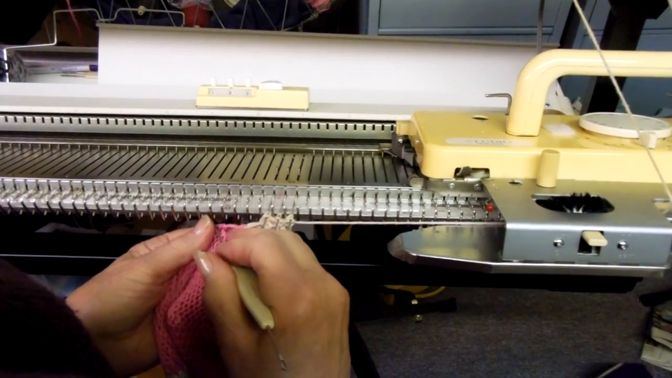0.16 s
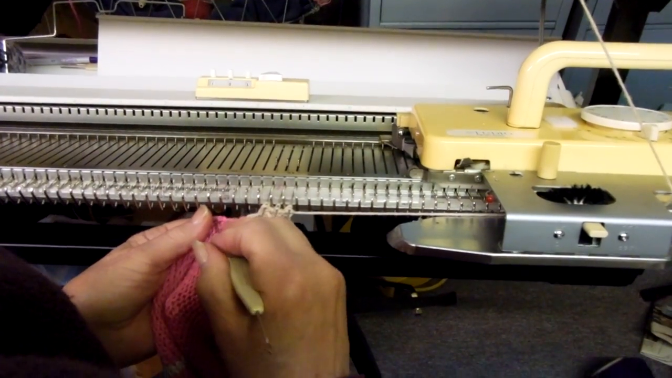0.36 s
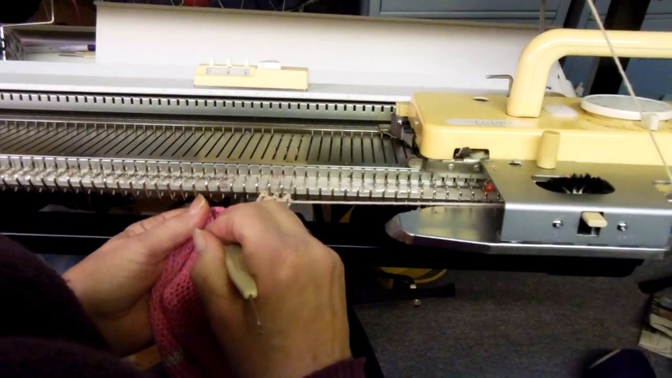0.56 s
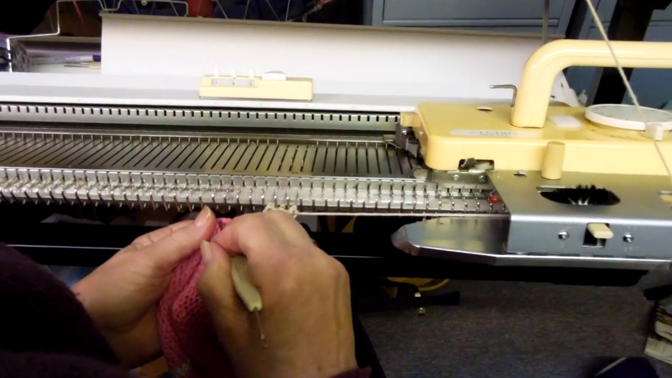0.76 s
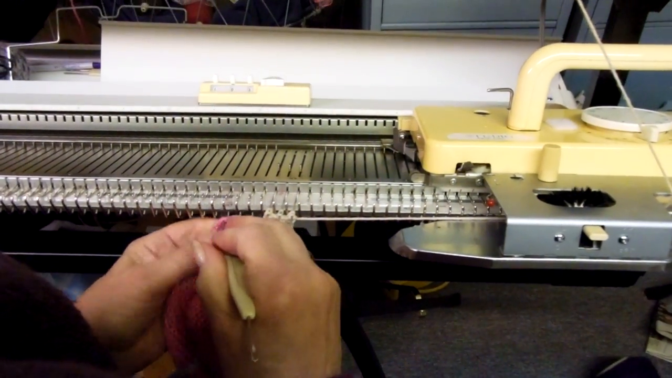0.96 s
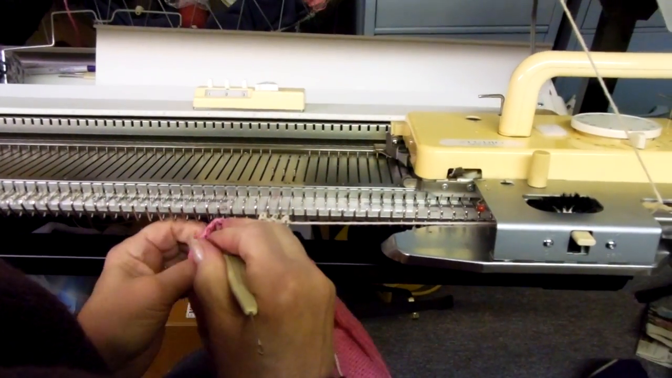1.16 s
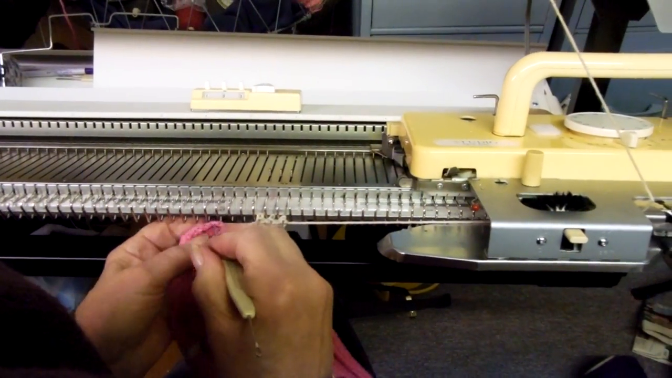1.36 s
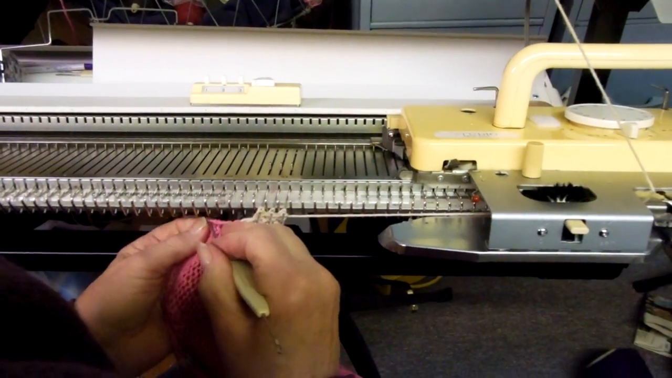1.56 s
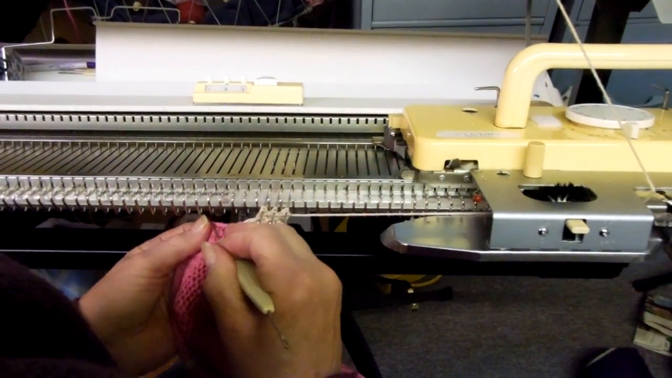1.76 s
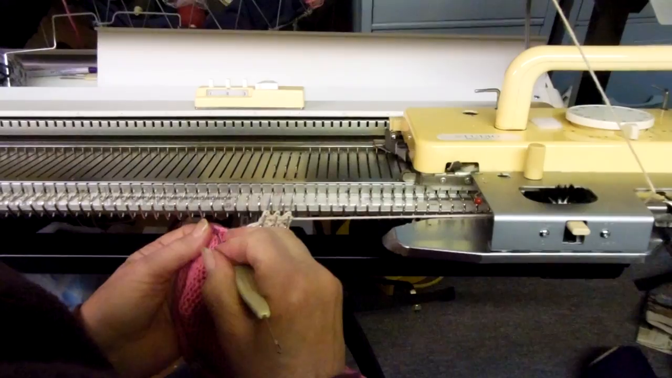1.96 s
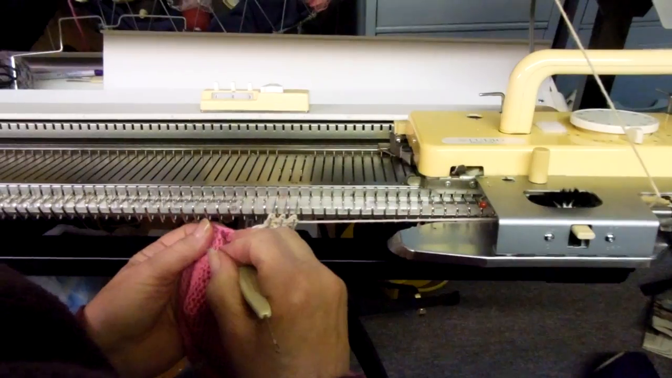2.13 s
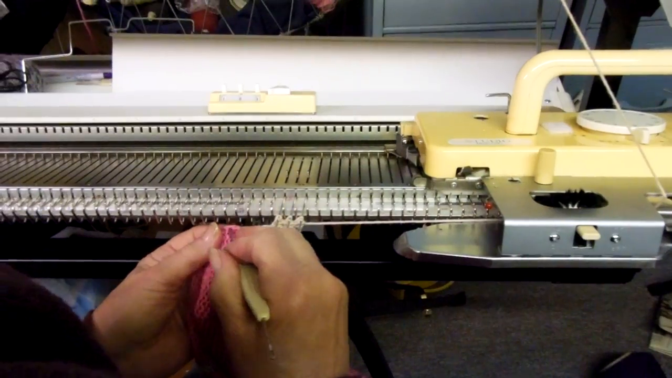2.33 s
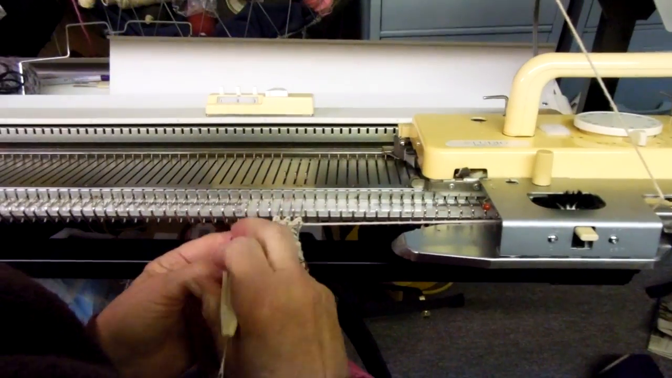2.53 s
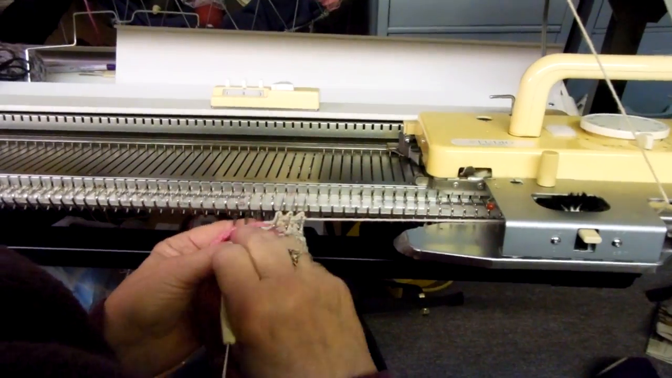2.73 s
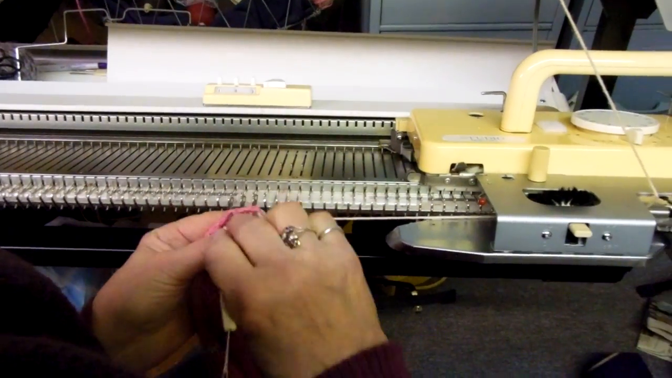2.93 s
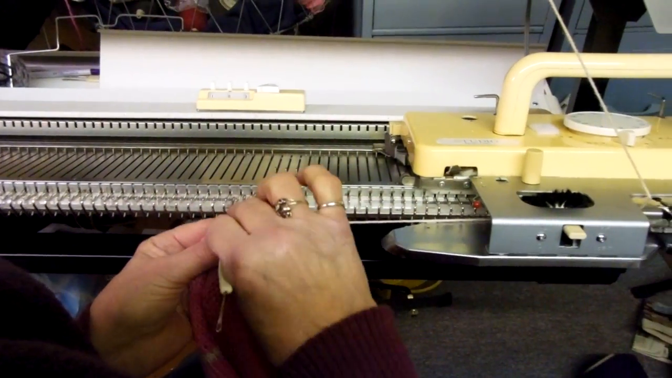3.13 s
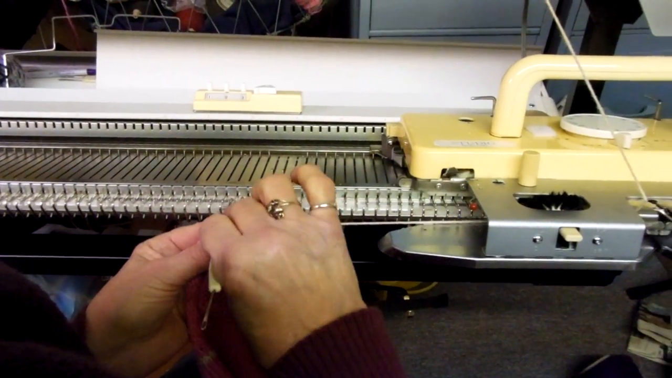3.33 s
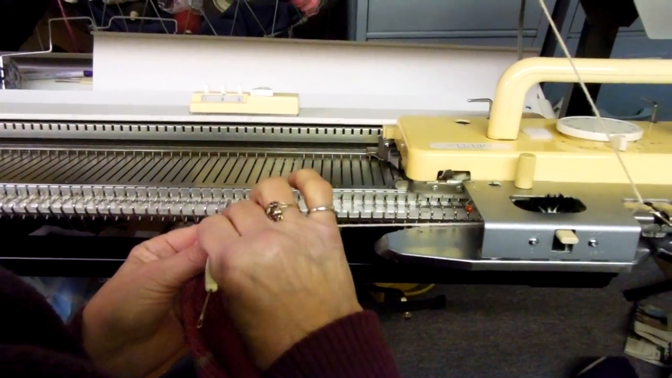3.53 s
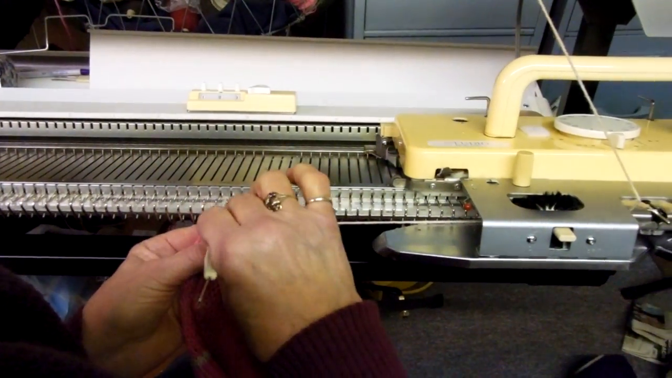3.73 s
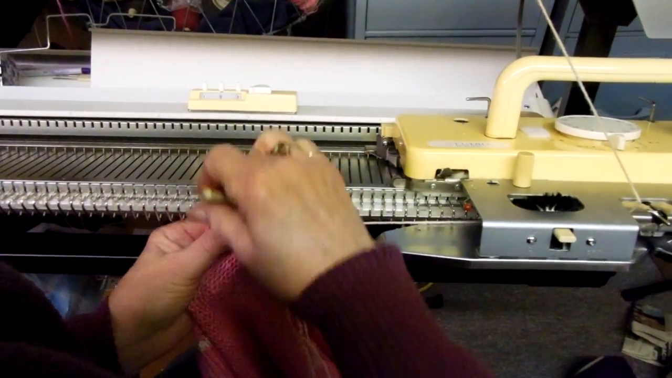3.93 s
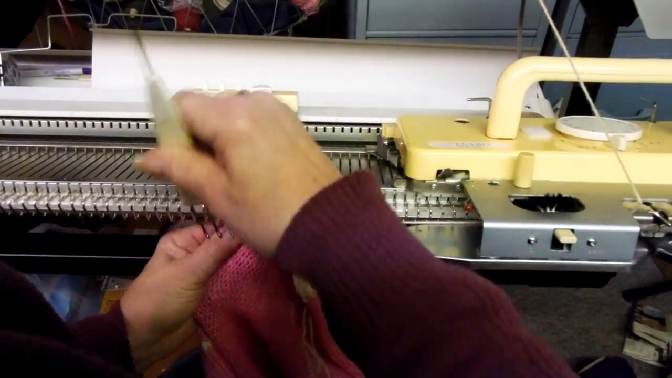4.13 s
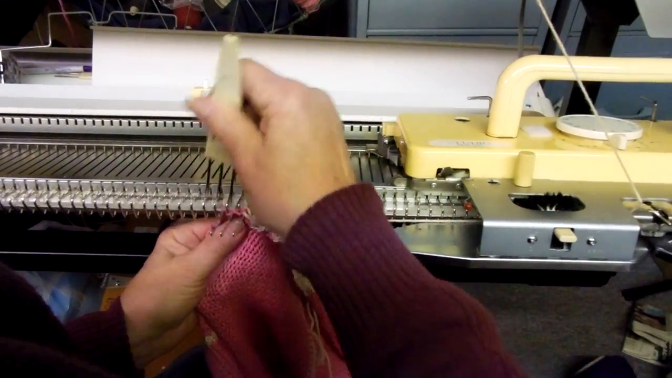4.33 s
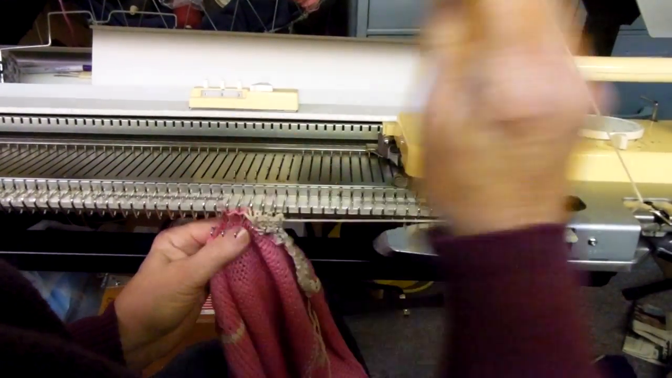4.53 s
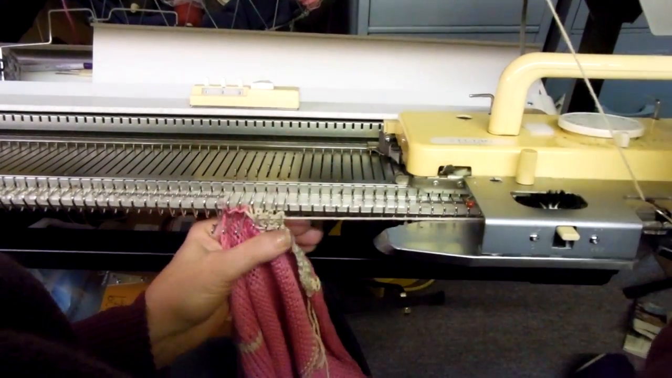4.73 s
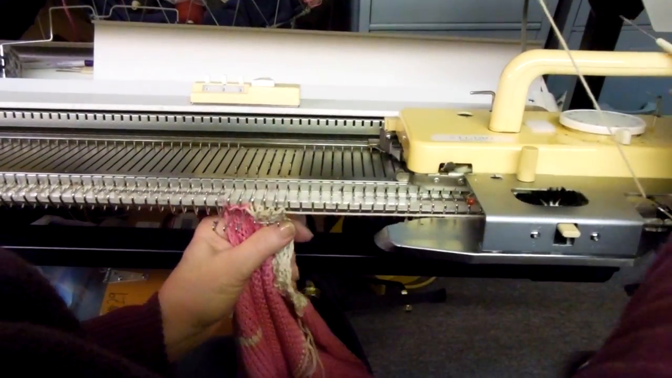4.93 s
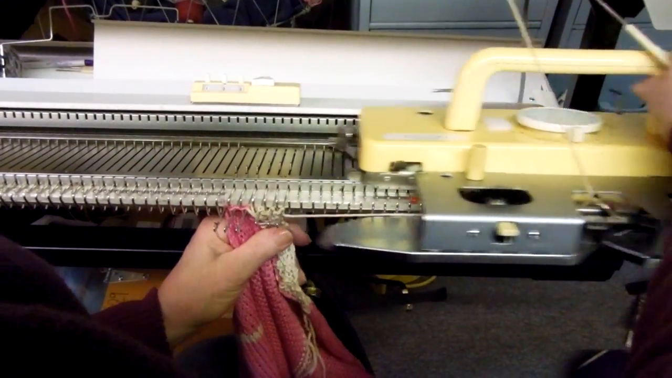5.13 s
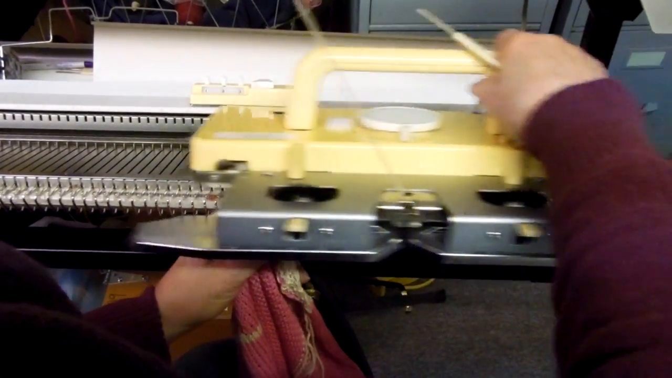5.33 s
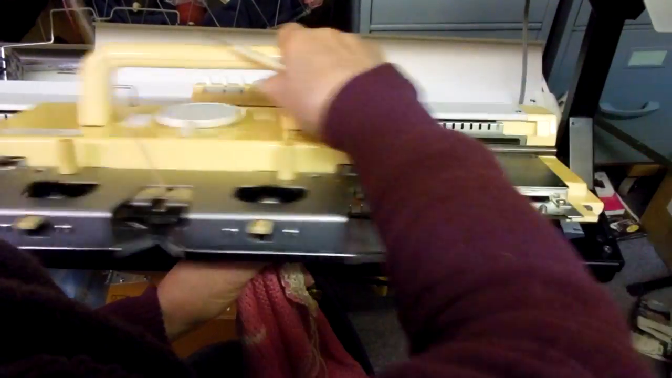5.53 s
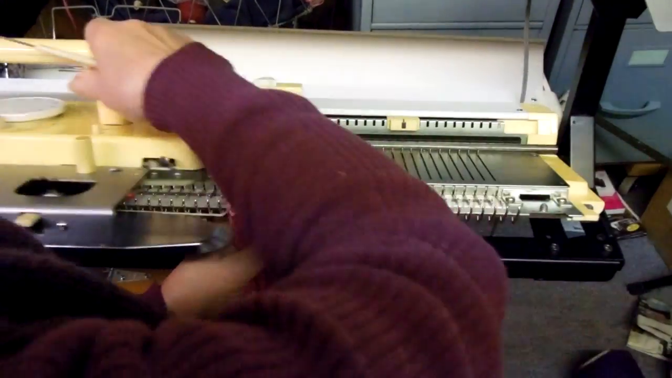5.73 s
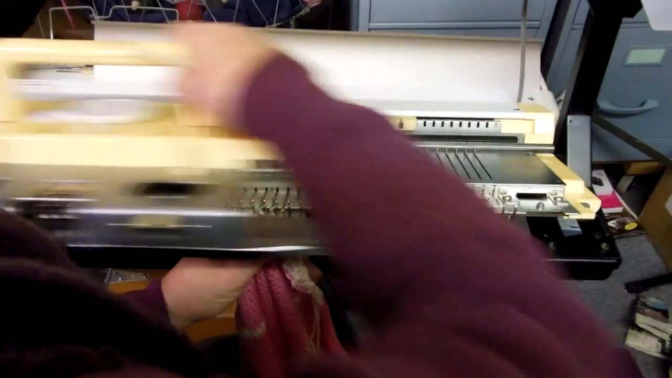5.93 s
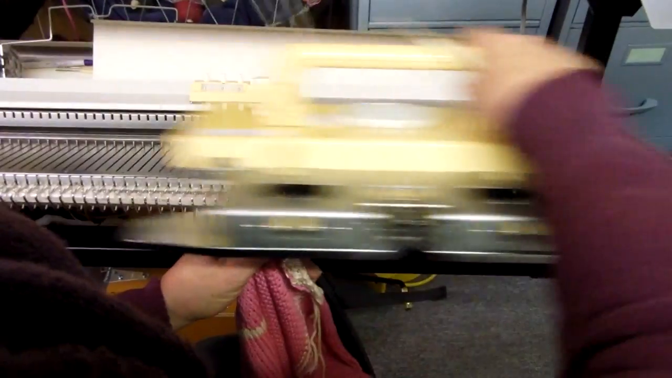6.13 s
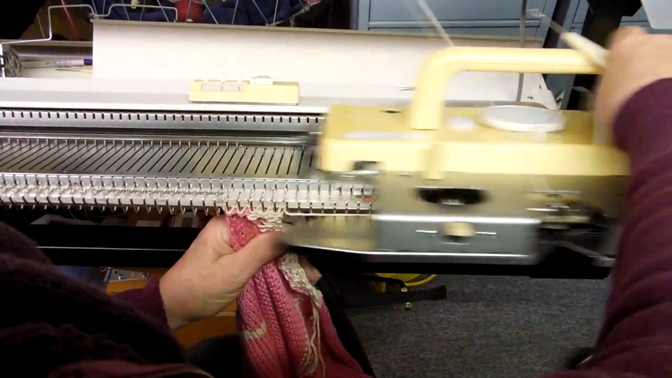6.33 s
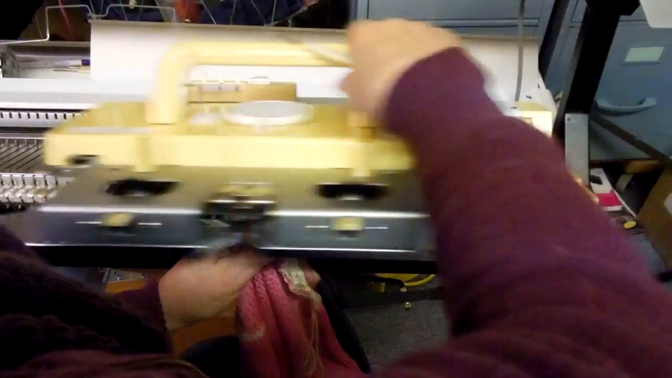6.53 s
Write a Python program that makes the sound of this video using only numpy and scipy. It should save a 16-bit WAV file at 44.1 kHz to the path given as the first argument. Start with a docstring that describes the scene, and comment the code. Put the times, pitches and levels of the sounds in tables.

```python
"""Knitting machine at close range

A quiet room, a small stereo microphone close to the needle bed. A hand tool ticks and scrapes on the
steel needles (short rings, bands of noise and gliding whistles), dry snaps and a low creak sit near the
microphone; then the carriage is pushed to and fro over the bed, its cams flicking needles in dense
bursts of pings and hiss, with rumble and thuds. Mains tones, a thin whine and room hiss lie underneath.
"""
import sys
import numpy as np
from scipy import signal
from scipy.fft import rfft, irfft, next_fast_len
from scipy.io import wavfile
from scipy.ndimage import map_coordinates

SR = 44100
rng = np.random.default_rng(int(sys.argv[2]) if len(sys.argv) > 2 else 0)


def output_pcm(signal):
    """Save a mono or channel-first signal as 16-bit PCM at the path in sys.argv[1].

    Samples are clipped to [-1, 1] before scaling.
    """
    pcm = np.clip(np.atleast_2d(signal).T, -1, 1) * 32767
    wavfile.write(sys.argv[1], SR, np.round(pcm).astype(np.int16))


N = 294709  # samples
TOP_HZ = 14200  # upper band limit


def amp(db):
    """Amplitude factor for a level in dB."""
    return 10 ** (np.asarray(db) / 20)


def unit(x):
    """x scaled to rms 1."""
    return x / np.sqrt(np.mean(x ** 2) + 1e-20)


def along(points, hz):
    """(Hz, value) points read off on a log frequency axis."""
    f, v = np.transpose(points)
    return np.interp(np.log(hz + 1), np.log(f + 1), v)


def curves(rows):
    """One value per sample for each column; the last item is 1 inside the span, with soft ends."""
    s, *cols = np.transpose(rows)
    t = np.arange(N) / SR
    to_nearest_end = np.minimum(t - s[0] + .002, s[-1] + .002 - t)
    inside = np.clip(to_nearest_end / .004, 0, 1)
    return [np.interp(t, s, c) for c in cols] + [inside]


def played(spans, layer):
    """A layer driven by the controls of each span in turn."""
    return sum(on * layer(*controls) for *controls, on in map(curves, spans))


def wobble(rate):
    """A smooth random curve, rate knots a second."""
    knots = rng.standard_normal(int(N * rate / SR) + 4)
    return map_coordinates(knots, [np.arange(N) * rate / SR])


def filtered(x, response):
    """x shaped by a complex response of frequency."""
    m = next_fast_len(N + SR // 2)
    return irfft(rfft(x, m) * response(np.fft.rfftfreq(m, 1 / SR)), m)[..., :N]


def noise(response):
    """Two unrelated coloured noises, rms 1 together: what both microphone ports share, and what differs."""
    return unit(filtered(rng.standard_normal((2, N)), response))


def resonances(modes):
    """Causal response of (Hz, width Hz, dB) modes, alternating in sign."""
    def response(f):
        total = 0
        for k, (centre, width, db) in enumerate(modes):
            damping = 1j * f * width
            total = total + (-1) ** k * amp(db) * damping / (centre * centre - f * f + damping)
        return total
    return response


def spread(pair, alike):
    """Left and right from a mid and an unrelated side signal, as alike as asked at each frequency."""
    def weights(hz):
        turn = np.arccos(np.clip(along(alike, hz), -1, 1)) / 2
        return np.array([np.cos(turn), np.sin(turn)])
    mid, side = filtered(pair, weights)
    return np.array([mid + side, mid - side])


# Colour of the room tone. Each row: frequency in Hz, relative level in dB.
ROOM_TONE = [(8, -4.5), (24, 0.5), (40, -13), (65, -6.5), (100, -17.5), (200, -20), (350, -24.5),
             (1000, -29), (3000, -35), (8000, -38.5), (14200, -38.5)]
# Two mains tones and a thin whine. Each row: frequency in Hz, relative level in dB.
MAINS_TONES = [(120, -63), (240, -60), (13192, -76)]
# How alike the room tone is at both ports. Each row: frequency in Hz, left-right likeness (1 is identical).
ROOM_TONE_ALIKE = [(60, 0.93), (180, 0.41), (550, 0.43), (1640, 0.19), (4950, 0.084), (14900, 0.053)]


def air():
    """Room rumble and hiss as coloured noise, with slowly wavering sines slightly louder left than right."""
    t = np.arange(N) / SR
    tones = 0
    for hz, db in MAINS_TONES:
        level = amp(db + 2 + 0.49 * wobble(5.4))
        tones = tones + level * np.sin(2 * np.pi * hz * t + 0.15 * wobble(3.04))
    hiss = spread(noise(lambda hz: amp(along(ROOM_TONE, hz))), ROOM_TONE_ALIKE)
    return amp(-50.5 + 0.043 * wobble(3.5)) * hiss + tones * amp([[.7], [-.7]])


# Modes of the needle bed. Each row: frequency in Hz, width in Hz, relative level in dB.
BED_MODES = [(518, 133, 1.5), (656, 124, 4), (754, 111, -1.5), (925, 61, 2), (1150, 1330, -9.5)]


def bed(hz):
    """The bed's modes; it is too narrow to radiate deep bass."""
    rise = 1j * hz / 380
    return resonances(BED_MODES)(hz) * (rise / (1 + rise)) ** 2


# Contacts of tool, needles and cams.
# Each row: start in seconds, relative level in dB, pitch of the contact's own band in Hz, high band over low in dB.
CONTACTS = [(1.094, -26.5, 3100, 7), (1.1238, -37, 2940, 4), (1.1464, -26.5, 13500, 25),
            (1.1882, -38, 12100, 20), (2.5536, -29, 13100, 14), (2.571, -30, 4330, 3),
            (2.6873, -39.5, 11300, 14), (2.7052, -33.5, 7840, 7), (2.8408, -37, 4060, 0),
            (3.1003, -30.5, 14000, 3), (3.1932, -36, 13800, 17), (3.2774, -45, 12200, 12),
            (3.6912, -37.5, 10900, 12), (3.7209, -34.5, 10700, 13), (3.7803, -35.5, 8600, 13),
            (3.907, -31, 12000, 8), (3.9464, -38.5, 3300, -3), (4.115, -41, 2470, -19),
            (4.162, -38, 2370, -8), (4.1774, -30, 13600, 11), (4.2068, -20, 5000, -3),
            (4.235, -12, 5600, 9), (4.239, -4.5, 9600, 14), (4.281, -49, 9000, 4), (4.307, -39, 7500, 5),
            (4.3595, -35.5, 4000, -6), (4.4172, -27, 5900, 2), (4.4303, -21, 5500, -7),
            (5.0782, -14, 2980, -2), (5.1125, -7, 12400, 15), (5.2007, -17, 2930, -7.5),
            (5.2624, -34, 2960, -17), (5.2867, -17.5, 3900, -5), (5.324, -17, 2930, 0),
            (5.3328, -19, 3050, -5), (5.6254, 1, 4630, 4), (5.7352, -4, 6800, 9), (5.7536, -7, 4160, 0),
            (5.824, -16.5, 7000, 4), (5.8358, -12.5, 7900, 4), (5.8485, -23, 10100, 24),
            (5.8716, -13, 11600, 11), (5.8846, -16.5, 8700, 17), (5.9525, -19.5, 3350, -5.5),
            (5.9695, -18, 9080, 5), (6.0718, -5, 13600, 17), (6.122, -2, 6700, 18), (6.2858, -15, 5140, 2),
            (6.3298, -18, 9400, 17), (6.35, -20.5, 13500, 10), (6.3798, -8, 14800, 20),
            (6.3924, -18.5, 8100, 21), (6.4656, -22.5, 2300, -7), (6.504, -13, 13700, 23)]
# What the needles ring with. Each row: frequency in Hz, relative level in dB, time to fall 60 dB in seconds.
NEEDLE_RINGS = [(3300, -19, .07), (3870, -5, .1), (4470, 2, 0.082), (5195, -14, 0.14), (6050, -15, .08),
                (7460, -13, .07), (9200, 0, 0.12), (11540, -8, .05), (13040, 8, 0.049)]
LOW_BAND_T60_S = .033
USUAL_LOW_HZ, USUAL_HIGH_HZ = 4290, 8600  # where the other band of a contact sits
BAND_SPLIT_HZ = 6300  # a pitch above this sets the high band, otherwise the low one


def ticks():
    """Each contact: a crack, a low and a high band, a faint needle ring; duller ones knock the bed harder."""
    out, blows = np.zeros((2, N + SR)), np.zeros((2, N + SR))
    t = np.arange(SR // 6) / SR
    above = signal.butter(2, 1900, "high", fs=SR)
    fall_db = -60 * t / LOW_BAND_T60_S
    attack = 1 - np.exp(-t / 0.0011)

    def band(x, hz, half_hz):
        edges = [hz - half_hz, hz + half_hz]
        return unit(signal.lfilter(*signal.butter(2, edges, "band", fs=SR), x))

    for s, db, hz, high_db in CONTACTS:
        low_hz, high_hz = (USUAL_LOW_HZ, hz) if hz > BAND_SPLIT_HZ else (hz, USUAL_HIGH_HZ)
        grit = rng.standard_normal((4, 2, len(t)))
        low = amp(fall_db - high_db / 2) * band(grit[0], low_hz, 900)
        # thin parts die sooner
        high = amp(2.57 * fall_db + high_db / 2 + 4.5) * band(grit[1], high_hz, 1270)
        crack = 1.66 * amp(1.38 * fall_db + min(high_db, 0)) * signal.lfilter(*above, grit[2])
        quiver = np.cumsum(rng.normal(0, .05, len(t)))  # random drift of phase
        ring = 0
        for mode_hz, level, t60 in NEEDLE_RINGS:
            ring_db = level - 23 + rng.normal(0, 3) - 60 * t / t60
            ring = ring + amp(ring_db) * np.sin(2 * np.pi * mode_hz * t + quiver)
        at = round(s * SR)
        out[:, at:at + len(t)] += amp(db - 13.0) * (low + high + crack + ring) * attack
        blows[:, at:at + len(t)] += amp(db - 11.0 - 0.45 * high_db + fall_db) * grit[3]
    return out[:, :N] + filtered(blows[:, :N], bed)


# Dry snaps close to the microphone. Each row: start in seconds, relative level in dB.
CLOSE_SNAPS = [(2.0321, -38.5), (2.178, -40), (2.1956, -36), (2.414, -40), (2.4314, -36), (2.4614, -23),
               (2.4978, -35.5), (3.08, -36)]


def snaps():
    """A few milliseconds of noise on a one-sided push, with no ring."""
    out, t = np.zeros(N), np.arange(400) / SR
    for s, db in CLOSE_SNAPS:
        push = rng.standard_normal(len(t)) - .4
        out[round(s * SR):][:len(t)] += amp(db - 4.0 - 60 * t / 0.0065) * push
    return filtered(out, lambda hz: 1 + 1.2 / (1 + 1j * hz / 400))  # bass lift


# Low creak near the microphone, one list per span. Each row: time in seconds, level in dB.
CREAK_SPANS = [
    [(2.1, -59), (2.182, -38.5), (2.22, -52.5), (2.39, -46.5), (2.41, -49.5), (2.444, -34.5), (2.47, -42)],
    [(2.5, -76), (2.522, -40.5), (2.57, -57)],
]
SLIPS_PER_S = 130  # at the middle pace


def creak():
    """Uneven slips, each a soft low push."""
    pace, size = amp(4 * wobble(60)), amp(4.5 * wobble(90))
    soft = resonances([(62, 82.0, 1), (176, 180, -4.5), (593, 290, -32.0)])
    slips = np.diff(np.floor(np.cumsum(SLIPS_PER_S * pace) / SR), prepend=0)
    pushes = unit(filtered(slips * size, soft))
    return played(CREAK_SPANS, lambda db: amp(db) * pushes)


# The tool dragged along needles. Each row: peak in seconds, rise in seconds, fall in seconds, grit in dB,
# whistle in dB, whistle at the peak in Hz, its sag at the ends in octaves, bed in dB.
DRAGS = [(2.463, 0.04, 0.0054, -35.5, -35, 9800, 0.32, -64),
         (2.557, .002, 0.047, -35.5, -30, 13000, 0.087, -63),
         (3.125, 0.046, 0.19, -50.5, -49.5, 5320, 0.26, -61),
         (3.195, .02, 0.055, -62, -51, 4700, 0.39, -77), (3.745, 0.045, 0.07, -51, -55, 3100, 0.3, -59),
         (4.115, 0.0014, 0.065, -72, -54, 2600, 0.53, -46),
         (4.245, .08, 0.071, -29, -29.5, 4950, 0.038, -34), (4.409, .012, 0.033, -55, -55, 5000, 0, -53),
         (4.437, 0.04, 0.07, -33, -38, 6100, 0.14, -38.5), (5.114, 0.0032, 0.074, -27, -35, 4400, .3, -59)]
DRAG_DEPTH_DB, BODY_SWING = 45, 0.62  # how far below its peak a drag starts and ends; the bed swings less


def scrapes():
    """Gritty noise, a narrow resonance of the needle, and a little of the bed; each drag swells and fades."""
    grit = noise(lambda hz: 1 / (1 + (2200 / (hz + 1)) ** 4)) * amp(3.5 * wobble(300))
    narrow = noise(lambda hz: 1 / (1 + (hz / 300) ** 4)) * amp(2.2 * wobble(70))
    body, out = noise(bed), 0
    for s, rise, fall, db, whistle_db, hz, sag, body_db in DRAGS:
        swell_db, on = curves([(s - rise, -DRAG_DEPTH_DB), (s, 0), (s + fall, -DRAG_DEPTH_DB)])
        glide_hz = hz * 2 ** (sag * swell_db / DRAG_DEPTH_DB)
        whistle = narrow * np.sin(2 * np.pi * np.cumsum(glide_hz) / SR)
        steel = amp(db) * grit + amp(whistle_db) * whistle
        out = out + on * (amp(swell_db) * steel + amp(body_db + BODY_SWING * swell_db) * body)
    return out


def pings(t0, t1, count, life, spiky_db):
    """Scattered needle pings of rms 1: damped sines of random pitch and size."""
    when, pitch, size, phase = rng.random((count, 4)).T[:, :, None]
    k = np.arange(256)
    hz = 1200 + (TOP_HZ - 1200) * pitch
    height = amp(-spiky_db * np.log(1 - size))
    wave = height * np.exp(-k / SR / life) * np.sin(2 * np.pi * (hz * k / SR + phase))
    at = ((t0 + (t1 - t0) * when) * SR).astype(int) + k
    rms = np.sqrt(np.sum(wave ** 2) / (t1 - t0) / SR)
    return np.bincount(at.ravel(), wave.ravel(), N + SR)[:N] / rms


def strikes(rate, life, spread_db):
    """Level jumps at random moments, each dying away: cams meeting needle butts."""
    when, size = rng.random((2, N))
    hits = (when < rate / SR) * amp(-spread_db * np.log(1 - size))
    return signal.lfilter([1], [1, -np.exp(-1 / (life * SR))], hits)


# Three carriage strokes in five spans, one list each; the first and fourth spans are dull run-ups.
# Each row: time in seconds, needle clatter in dB, body rumble in dB.
CARRIAGE_SPANS = [
    [(5.15, -58, -58), (5.25, -51.5, -67.5), (5.3, -47.5, -54), (5.345, -40, -44.5), (5.419, -35.5, -42.5)],
    [(5.421, -20.5, -42.5), (5.47, -22, -29.5), (5.52, -17, -28.5), (5.585, -19, -37), (5.64, -15.5, -31.5),
     (5.69, -19.5, -26), (5.71, -29, -36.5), (5.75, -26.5, -26.5), (5.78, -31, -41), (5.82, -35.5, -49.5),
     (5.89, -36.5, -43), (5.92, -57, -61), (5.945, -54, -57)],
    [(5.955, -48, -56), (5.99, -32.5, -39.5), (6.02, -23.5, -37.5), (6.066, -28, -33), (6.074, -18.5, -40),
     (6.12, -15, -23), (6.17, -17.5, -38), (6.235, -19, -25.5), (6.265, -34, -32), (6.31, -32, -44.5),
     (6.37, -42.5, -52), (6.41, -51, -46), (6.45, -79, -78)],
    [(6.468, -31.5, -66), (6.496, -56.5, -60)],
    [(6.5, -28, -39.5), (6.54, -25.5, -34), (6.58, -23, -33.5), (6.62, -15.5, -26.5), (6.65, -17, -30.5),
     (6.69, -20.5, -39)],
]
# One row per span. Each row: treble tilt in dB, table thud at the usual rumble in dB.
SPAN_TONES = [(-7.5, -45.5), (0.5, -47.5), (3, -50), (-15, -48), (2.5, -49)]
# Colour of the needle clatter. Each row: frequency in Hz, relative level in dB.
CLATTER_COLOUR = [(760, -35), (1300, -16.5), (1920, -1), (2470, -1), (5710, 0.5), (6190, -1), (6640, -1),
                  (8030, -2.5), (13500, -2.5), (14200, -1)]
# Modes of the table under the machine. Each row: frequency in Hz, width in Hz, relative level in dB.
TABLE_MODES = [(84.5, 12, 0), (148, 81, -1.5)]
USUAL_CLATTER_DB, BRIGHTENS = -27.5, 0.32  # treble tilt in dB gained per dB of clatter above the usual
USUAL_RUMBLE_DB, THUD_FOLLOWS = -30, 0.73  # thud dB gained per dB of rumble above the usual


def carriage():
    """Cams flick needle after needle: clumped pings over hiss, a rumble in the bed, thuds in the table."""
    flicks = np.array([pings(5.2, 6.7, count=7000, life=0.0017, spiky_db=2.5) for part in range(2)])
    sliding = rng.standard_normal((2, N))
    needles = filtered(0.45 * flicks + 0.81 * sliding, lambda hz: amp(along(CLATTER_COLOUR, hz)))
    needles /= np.std(needles[:, -SR:])  # level set over the last second
    needles *= (0.83 + 0.28 * strikes(190, 0.0028, 2.63)) * amp(0.46 * wobble(60))
    high = filtered(needles, lambda hz: 1 / (1 + (7000 / (hz + 1)) ** 4))
    rumble = amp(3.1 * wobble(45)) * noise(bed)
    thud = noise(resonances(TABLE_MODES))

    def span(rows, tilt_db, table_db):
        db, body_db, on = curves(rows)
        bright_db = tilt_db + BRIGHTENS * (db - USUAL_CLATTER_DB)
        thud_db = table_db + THUD_FOLLOWS * (body_db - USUAL_RUMBLE_DB)
        clatter = amp(-bright_db / 4) * (needles - high) + amp(bright_db * 0.84) * high
        return on * (amp(db) * clatter + amp(body_db) * rumble + amp(thud_db) * thud)

    return sum(span(rows, *tone) for rows, tone in zip(CARRIAGE_SPANS, SPAN_TONES))


# How fast the room falls silent. Each row: frequency in Hz, time to fall 60 dB in seconds.
ROOM_DECAY = [(300, 0.31), (3000, 0.13), (12000, 0.033)]


def walls(x):
    """Each frequency of the room's answer dies at its own speed."""
    hz, t, z = signal.stft(rng.standard_normal((2, SR // 3)), SR, nperseg=256)
    fading = z * amp(-60 * t / along(ROOM_DECAY, hz)[:, None])
    tail = signal.istft(fading, SR, nperseg=256)[1]
    later = np.pad(x, (200, 0))  # samples before the walls answer
    return signal.fftconvolve(later[None], tail / np.linalg.norm(tail[0]), axes=1)[:, :N]


# How alike the near machine is at both ports. Each row: frequency in Hz, left-right likeness (1 is identical).
MACHINE_ALIKE = [(60, 0.97), (180, 1), (550, 0.99), (1640, 0.95), (4950, 0.74), (14900, 0.15)]
# Balance of the machine. Each row: frequency in Hz, left minus right in dB.
MACHINE_BALANCE = [(60, 1), (150, 2), (380, 1), (950, 3), (2370, -0.5), (5950, 3.5), (14900, -5.5)]


def placed(pair):
    """The bed is long and near: the ports agree in the bass, less in the treble."""
    return filtered(spread(pair, MACHINE_ALIKE), lambda hz: amp(along(MACHINE_BALANCE, hz) * [[.5], [-.5]]))


def ducking(loud):
    """Gain that sinks the room tone while the machine is loud and lets it come back slowly."""
    keep = np.exp(-1 / (.5 * SR))  # half a second of memory
    power = signal.lfilter([1 - keep], [1, -keep], loud ** 2)
    return (1 + power / amp(-28.5) ** 2) ** -.3


def scene():
    """The machine with its walls, the creak and snaps near the microphone, and the room tone beneath."""
    room = air()
    machine = ticks() + scrapes() + carriage()
    shared = machine[0]  # the part common to both ports
    deep = filtered(room, lambda hz: 1 / (1 + (hz / 45) ** 4))  # the deepest rumble stays steady
    near = placed(machine + amp(-17.0) * walls(shared)) + snaps() + creak()
    return near + deep + ducking(shared) * (room - deep)


FULL_SCALE = .9  # level the rounded peaks approach


def record(dry):
    """The loudest peaks round off near full scale; nothing is kept above the band limit."""
    rounded = dry / (1 + np.abs(dry / FULL_SCALE) ** 6) ** (1 / 6)
    return filtered(rounded, lambda hz: 1 / (1 + (hz / TOP_HZ) ** 300))


dry = scene()
out = record(dry)
output_pcm(out)
```